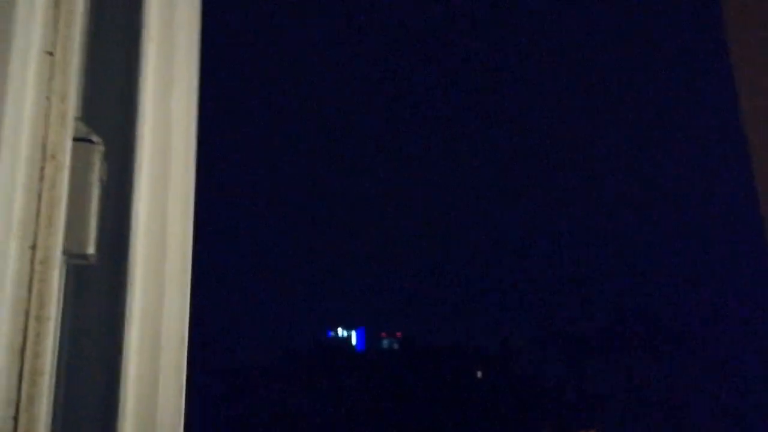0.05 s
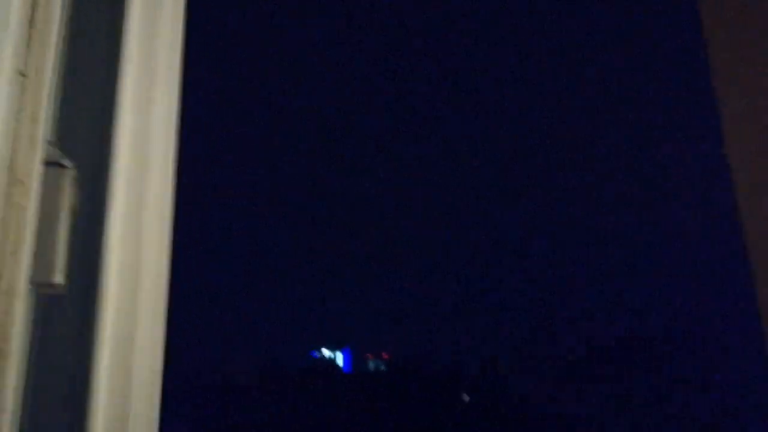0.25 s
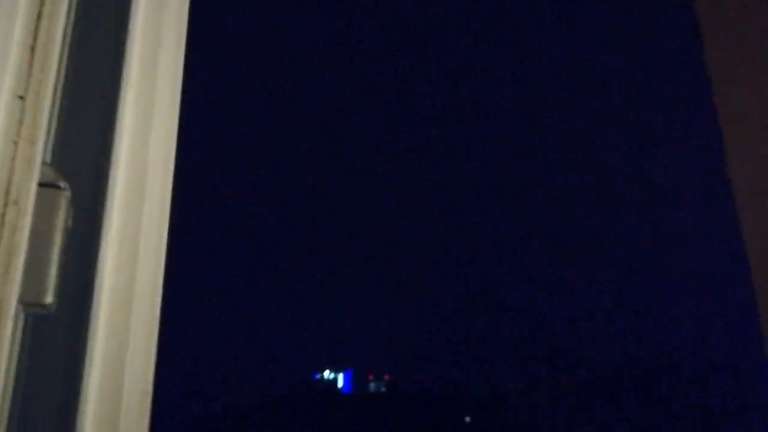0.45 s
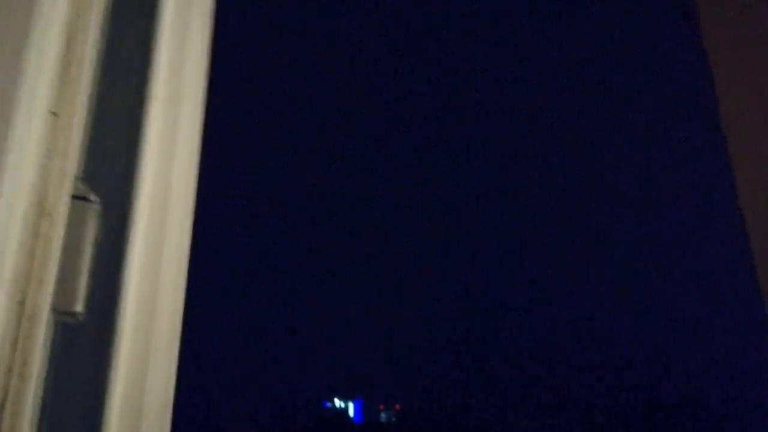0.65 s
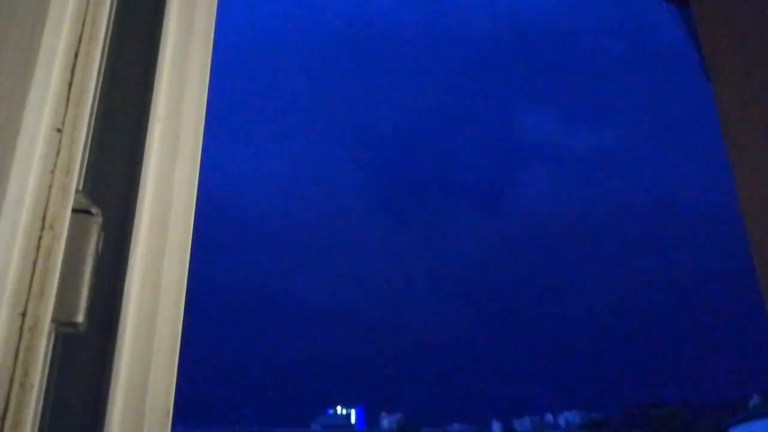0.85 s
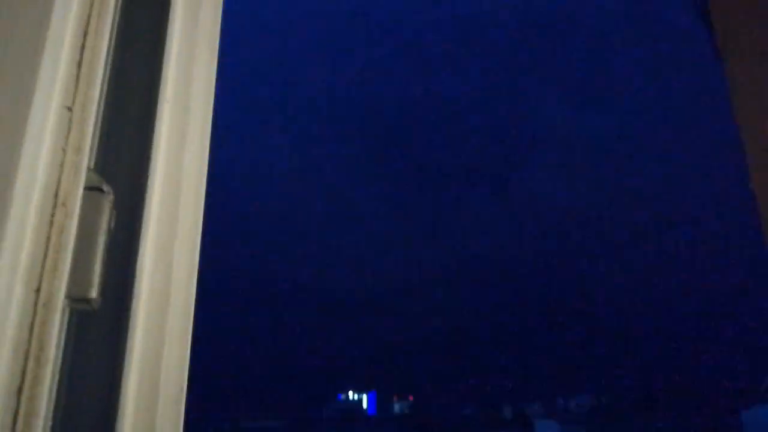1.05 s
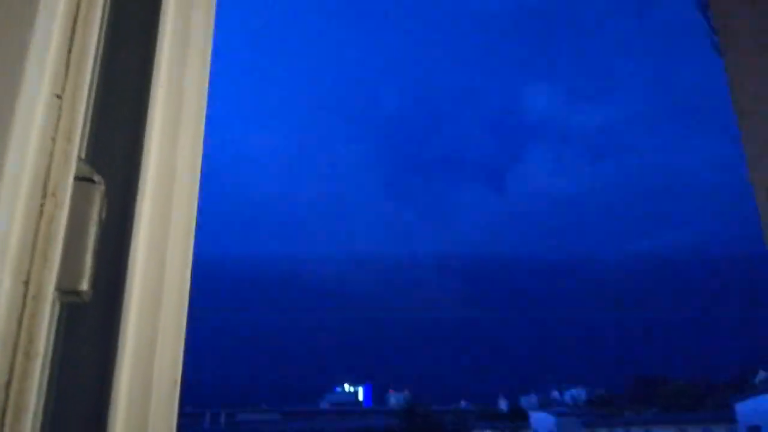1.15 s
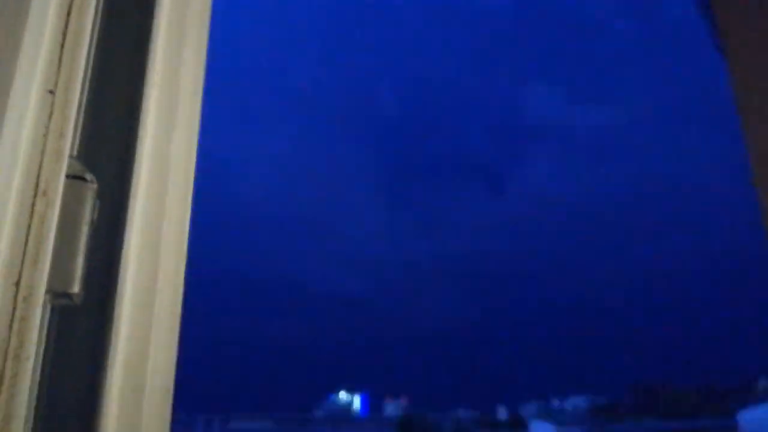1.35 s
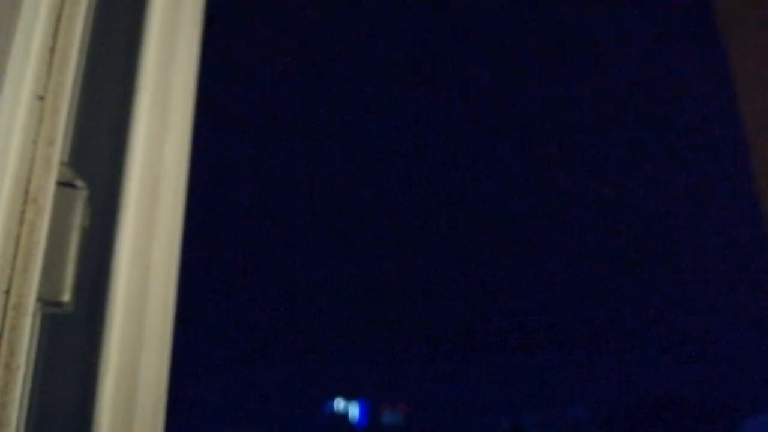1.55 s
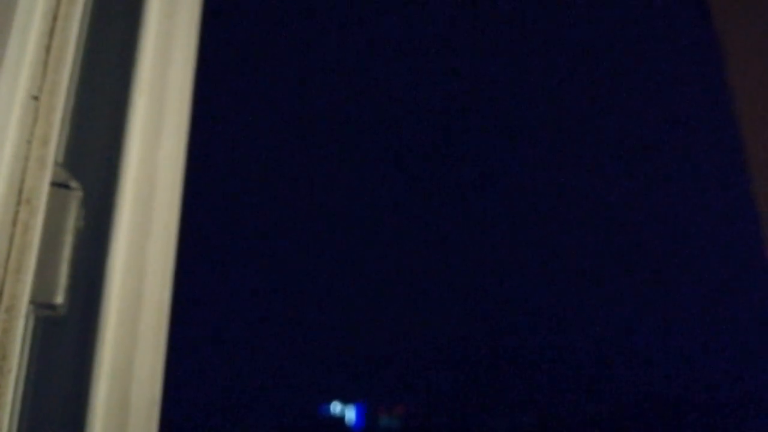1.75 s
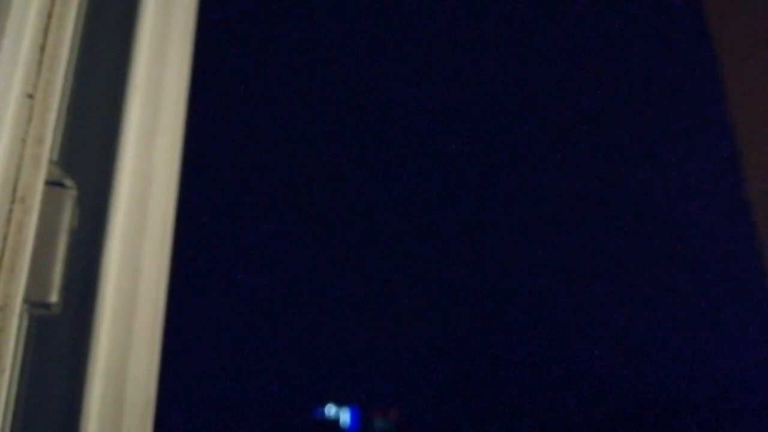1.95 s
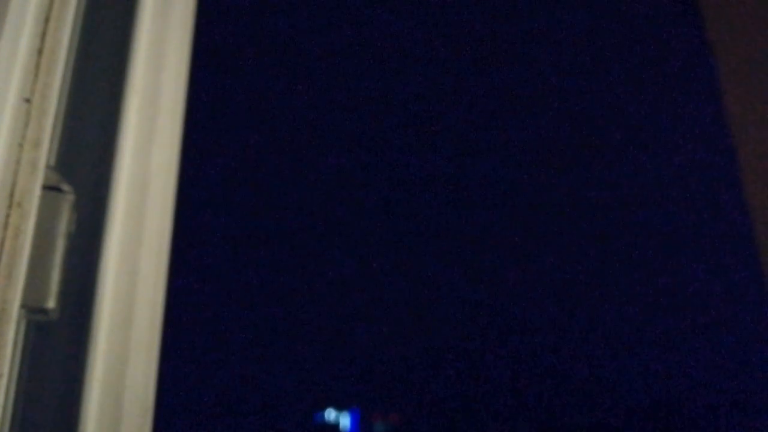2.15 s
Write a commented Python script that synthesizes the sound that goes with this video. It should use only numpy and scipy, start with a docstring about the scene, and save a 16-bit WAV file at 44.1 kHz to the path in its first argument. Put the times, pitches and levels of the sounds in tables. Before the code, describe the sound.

Steady night rain comes in through an open window after a split second of silence, an even hiss over a low rumble lasting to the end, just past 2 seconds. At about 0.2 seconds a hand bumps the microphone with dull thuds and a short rustle, fading by 0.6. Close drops tick lightly on the sill throughout, and three faint drips ping near 0.7, 1.0 and 1.6 seconds.

```python
"""After a moment of silence, steady night rain comes through an open window, over a low rumble.
Countless far drops merge into a hiss that lasts to the end.
Just after the sound opens, a hand bumps and rubs the recorder it holds, with dull thuds and a rustle.
Meanwhile, nearer drops start to splash on the sill; later, three drips ring briefly among them."""
import sys
import numpy as np
from scipy import signal
from scipy.fft import rfft, irfft
from scipy.io import wavfile
from scipy.ndimage import uniform_filter1d

SR = 44100
rng = np.random.default_rng(int(sys.argv[2]) if len(sys.argv) > 2 else 0)


def inscribe(sig):
    """Save sig as 16-bit PCM at rate SR to the path in sys.argv[1].

    A 1-D sig is mono; a 2-D sig holds one channel per row.
    Samples are clipped to [-1, 1] before scaling.
    """
    pcm = np.round(np.clip(np.atleast_2d(sig).T, -1, 1) * 32767)
    wavfile.write(sys.argv[1], SR, pcm.astype(np.int16))


N = 97020  # 2.2 seconds

# Tone of the outdoor rumble: frequency_hz, base_level_db (per Hz)
RUMBLE_TONE = [(8,-89),(22,-100),(38,-78.5),(65,-88),(100,-86.5),(135,-89.5),(185,-91.5),(245,-98),(320,-99),(450,-110),(900,-130)]
# How the rumble rises and falls: time_s, gain_db
RUMBLE_SWELLS = [(.15,5),(.4,-0.5),(.72,0.5),(.85,-3),(.95,2.5),(1.06,3),(1.18,0),(1.7,-1.5),(1.83,-0.5),(1.95,-2),(2.06,2),(2.2,-2.5)]
# Soft bumps on the recorder's case: peak_s, pitch_hz, level_db, half_length_s
CASE_BUMPS = [(0.189,55,-44,0.0094),(0.2156,99,-22.5,0.0059),(.214,267,-35,.005),(.214,412,-46.5,0.0035),(0.223,35,-39,0.02),(.250,72.4,-44.5,0.023),(0.279,113,-42.5,0.0065),(.304,50.3,-31.5,0.01),(0.3488,70,-37.5,0.0056),(0.363,39.6,-43.5,0.013),(0.416,298,-59,0.0042),(0.43,60.5,-52,0.0081),(.476,54,-57,.012),(0.562,61,-44,0.0076)]
# Fingers rubbing the case: start_s, level_db, centre_hz, width_octaves, decay_s, left_minus_right_db
FINGER_RUBS = [(.214,-58.5,5000,0.7,.016,0),(.219,-58,1480,0.79,0.062,-3),(.24,-80.5,6500,0.59,0.18,-20)]
# Drips that ring: peak_s, pitch_hz, level_db, half_length_s, left_minus_right_db
RINGING_DRIPS = [(.735,1760,-53.5,0.0043,3),(.954,1736,-58.5,0.0064,4),(1.551,1780,-65,0.0032,10)]
# Drops hitting the sill: start_s, level_db, centre_hz, width_octaves, decay_s, left_minus_right_db
SILL_SPLASHES = [(.260,-54.5,7140,0.2,0.0014,2),(.301,-61,8200,0.28,0.0042,-5),(.412,-61.5,950,0.25,0.012,-2),(.457,-63,7200,0.25,0.0033,-7),(.578,-67.5,6960,0.41,0.045,-3),(.709,-64,5900,0.26,0.0068,3),(.924,-55.5,3720,0.32,0.0027,9),(1.171,-56.5,1110,0.25,0.01,-4),(1.075,-68,7300,0.38,0.033,-3),(1.383,-60,6030,0.39,0.0066,-3),(1.423,-68,8000,0.44,0.0071,-2),(1.541,-65,7500,0.25,.003,-2),(1.609,-57,6900,0.26,.0015,-8),(1.664,-63,8500,.8,0.0027,-9),(1.668,-58.5,3840,0.93,0.012,2),(1.716,-67,13500,.3,.002,10),(1.9155,-54.5,6500,0.24,.004,-6.5),(1.9652,-53,1500,1.1,0.0015,-17),(1.972,-57,1500,1.1,.009,-1),(1.997,-58,1410,0.19,0.0025,-1),(2.039,-62,6000,0.52,0.0046,-2),(2.178,-65.5,6750,0.25,0.0056,-5)]
# Tone of the rain: frequency_hz, left_base_level_db, right_base_level_db (both per Hz)
RAIN_TONE = [(58.5,-118,-118),(296,-102,-102),(430,-100,-101),(550,-99.4,-94.5),(660,-100,-94),(727,-97.5,-90.5),(800,-101,-92.5),(823,-93.5,-89.5),(990,-100.5,-94.5),(1280,-96.5,-95),(1630,-99.8,-97.5),(1835,-97.5,-96),(2270,-101,-102.4),(3050,-100.2,-102),(4060,-102.3,-104.2),(5940,-105.7,-104.9),(6630,-107.1,-102.8),(8480,-111.3,-107.7),(10140,-116.4,-114.9),(12500,-118.5,-118.1),(15500,-119.3,-118.8)]
# How much of the rain reaches both microphones alike: frequency_hz, share_0_to_1
RAIN_SHARED = [(250,0.94),(700,0.69),(1000,0.55),(1800,0),(3200,0.05),(6000,0)]


def gain(db):
    """Turn decibels into a number to multiply by."""
    return 10 ** (np.asarray(db) / 20)


def normalise(sound):
    """Scale a sound to an average strength (rms) of 1."""
    return sound / (np.sqrt(np.mean(sound ** 2)) + 1e-18)


def frequencies():
    """The frequency of each point in a spectrum, in Hz."""
    return np.maximum(np.arange(N // 2 + 1) * SR / N, 1)


def curve(table, column=1):
    """Join a table's points to get a value for every frequency."""
    rows = np.array(table, float)
    return np.interp(np.log(frequencies()), np.log(rows[:, 0]), rows[:, column])


def wander(rate_hz):
    """A smooth random drift with a typical size of 1."""
    hold = int(SR / rate_hz)
    steps = np.repeat(rng.standard_normal(N // hold + 1), hold)
    return normalise(uniform_filter1d(uniform_filter1d(steps, hold), hold)[:N])


def noise_band(centre_hz, width_octaves):
    """Noise around one frequency, unrelated on the left and right."""
    bell = np.exp(-0.5 * (np.log2(frequencies() / centre_hz) / width_octaves) ** 2)
    return normalise(irfft(rfft(rng.standard_normal((2, N))) * bell, N))


def delay_left(sound, lag_s):
    """Make stereo: the left side hears the sound later, or earlier if the lag is negative."""
    left = irfft(rfft(sound) * np.exp(-2j * np.pi * frequencies() * lag_s), N)
    return np.array([left, sound])


def pan(side_db):
    """Left and right gains; above 0 dB the left is louder."""
    return gain(np.array([[side_db], [-side_db]]) / 2)


def rise_and_fade(start_s, attack_s, decay_s):
    """The loudness shape of a hit: it rises quickly, then dies away."""
    age_s = np.maximum(np.arange(N) / SR - start_s, 0)
    return (1 - np.exp(-age_s / attack_s)) * np.exp(-age_s / decay_s)


def short_tone(peak_s, pitch_hz, half_length_s):
    """A brief vibration that swells and dies away."""
    t = np.arange(N) / SR - peak_s
    return np.sin(2 * np.pi * pitch_hz * t) * np.exp(-(t / half_length_s) ** 2)


def noise_bursts(table, attack_s):
    """Short noisy touches, each with its own strength, tone and side."""
    out = 0
    for start_s, level_db, centre_hz, width_octaves, decay_s, side_db in table:
        shape = rise_and_fade(start_s, attack_s, decay_s)
        burst = normalise(noise_band(centre_hz, width_octaves) * shape)
        shape_strength = np.sqrt(np.mean(shape ** 2))
        out = out + gain(level_db) * pan(side_db) * burst * shape_strength
    return out


def outdoor_rumble():
    """Low, wavering noise from outside, nearly the same on both sides."""
    spectrum = rfft(rng.standard_normal(N)) * gain(curve(RUMBLE_TONE))
    rumble = irfft(spectrum, N) * np.sqrt(SR / 2)  # makes the table's levels count per Hz
    swell_db = np.interp(np.arange(N) / SR, *np.array(RUMBLE_SWELLS).T)
    gain_db = 2 + swell_db + 1.17 * wander(rate_hz=11.9)
    return delay_left(rumble * gain(gain_db), lag_s=0.000434)


def hand_on_recorder():
    """A hand jolts the case in dull thuds that die at once, and fingers slide over it."""
    thuds = sum(gain(level_db) * short_tone(peak_s, pitch_hz, half_length_s)
                for peak_s, pitch_hz, level_db, half_length_s in CASE_BUMPS)
    rubs = noise_bursts(FINGER_RUBS, attack_s=0.0009)
    return delay_left(thuds, lag_s=-0.00087) + rubs


def drips(ring_db=-8.5):
    """Water drips on one spot with a soft ping and a faint ring after it."""
    out = 0
    for peak_s, pitch_hz, level_db, half_length_s, side_db in RINGING_DRIPS:
        ping = short_tone(peak_s, pitch_hz, half_length_s)
        ring_shape = rise_and_fade(peak_s, attack_s=half_length_s, decay_s=0.018)
        ring = gain(ring_db) * noise_band(pitch_hz, width_octaves=0.075) * ring_shape
        out = out + gain(level_db) * pan(side_db) * (ping + ring)
    return out


def splashes():
    """Near drops hit the sill, each with a sudden tick of noise."""
    return noise_bursts(SILL_SPLASHES, attack_s=0.0001)


def patter_spectrum(band_drops_per_s=900, size_spread_db=3, decay_s=0.0012, flicker_db=1.26):
    """In each frequency band, drops add tiny bursts of random size to the hiss of far rain."""
    spectrum = 0
    edges_hz = [0, 900, 2000, 4000, 7500, SR]
    for low_hz, high_hz in zip(edges_hz, edges_hz[1:]):
        sizes = gain(size_spread_db * np.minimum(rng.exponential(size=N), 5))
        hits = (rng.random(N) < band_drops_per_s / SR) * sizes ** 2
        energy = signal.lfilter([1], [1, -np.exp(-2 / (decay_s * SR))], hits)  # each hit fades
        patter_share = 0.35 * min(high_hz / 3000, 1)  # low bands are smoother
        loudness = np.sqrt(1 - patter_share + patter_share * energy / energy.mean())
        patter = loudness * rng.standard_normal(N)
        flicker = gain(flicker_db * wander(rate_hz=16.13))
        in_band = (frequencies() >= low_hz) & (frequencies() < high_hz)
        spectrum = spectrum + rfft(patter * flicker) * in_band
    return spectrum


def rain():
    """Low rain noise comes as one wave from the window on the right; the highs come from all around."""
    share = np.clip(curve(RAIN_SHARED), 0, 1)
    from_window = rfft(delay_left(irfft(patter_spectrum(), N), lag_s=0.000653))
    all_around = np.array([patter_spectrum(), patter_spectrum()])
    spectrum = np.sqrt(share) * from_window + np.sqrt(1 - share) * all_around
    tone = gain(np.array([curve(RAIN_TONE, column=1), curve(RAIN_TONE, column=2)]))
    gain_db = -0.5 - 0.06 * wander(rate_hz=3.6)
    return irfft(spectrum * tone, N) * np.sqrt(SR / 2) * gain(gain_db)


def scene():
    """Add all the sounds together, in stereo."""
    return rain() + outdoor_rumble() + splashes() + drips() + hand_on_recorder()


def record(dry):
    """Start silent, open a little quiet, settle to full level; cut off the very highest sounds."""
    open_s, fade_in_s, settle_s, opening_db, top_hz = 0.1475, 0.011, 0.057, -4, 15720
    age_s = np.arange(N) / SR - open_s
    fade_in = np.clip(age_s / fade_in_s, 0, 1)
    settle = gain(opening_db * np.clip(1 - age_s / settle_s, 0, 1))
    treble_cut = signal.ellip(12, 0.1, 80, top_hz, fs=SR, output="sos")
    return signal.sosfilt(treble_cut, dry * fade_in * settle)


dry = scene()
out = record(dry)
inscribe(out)
```